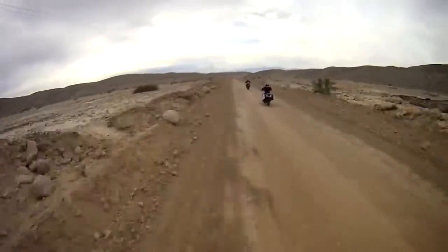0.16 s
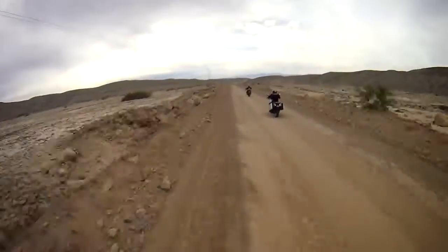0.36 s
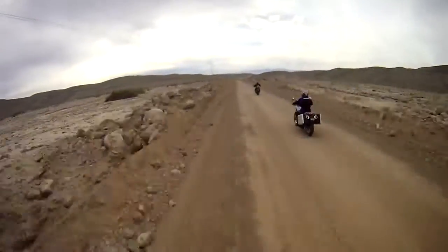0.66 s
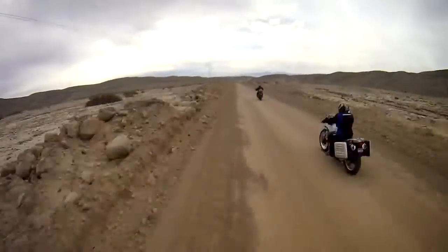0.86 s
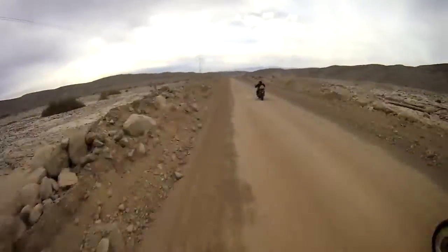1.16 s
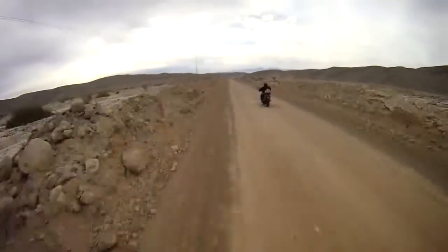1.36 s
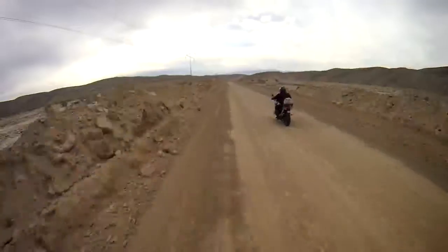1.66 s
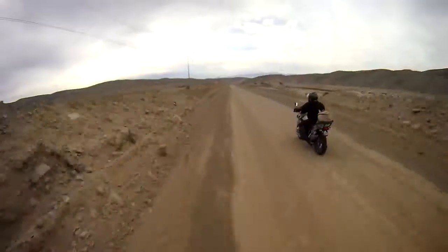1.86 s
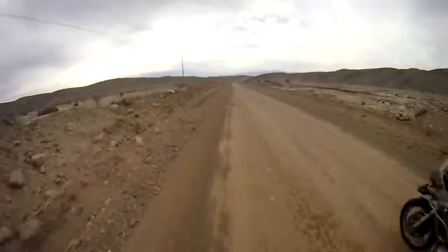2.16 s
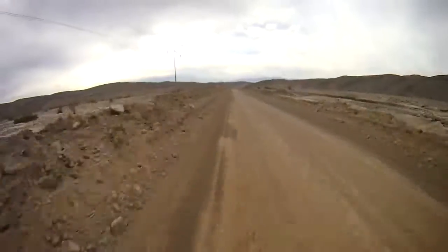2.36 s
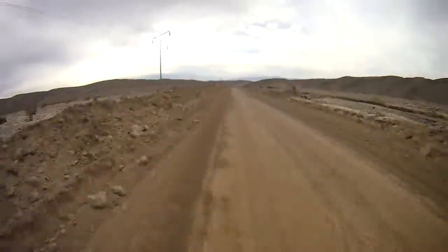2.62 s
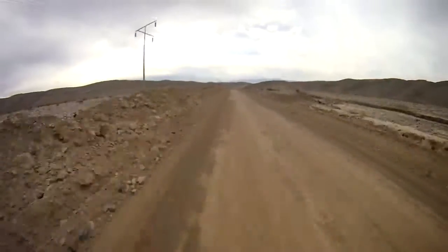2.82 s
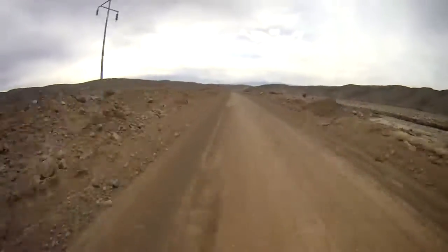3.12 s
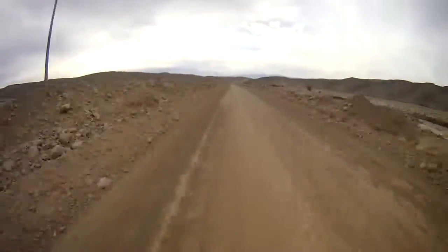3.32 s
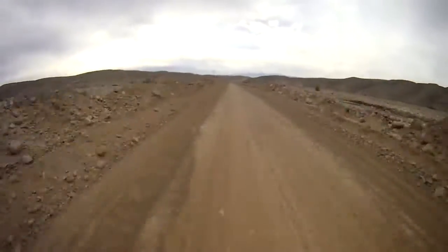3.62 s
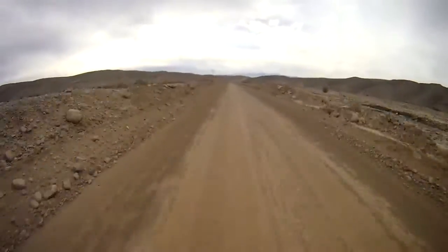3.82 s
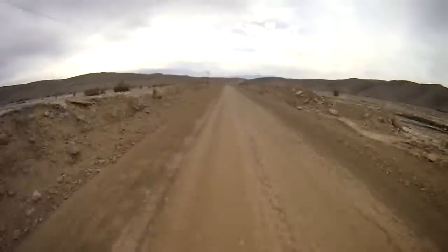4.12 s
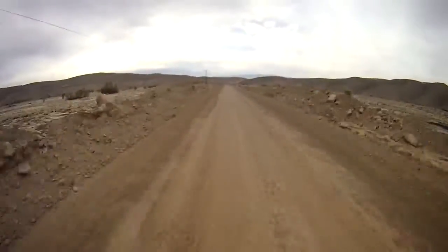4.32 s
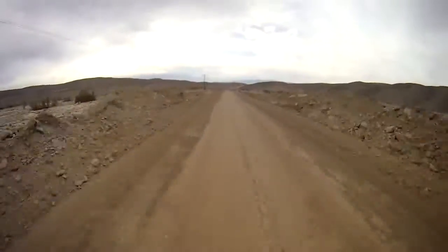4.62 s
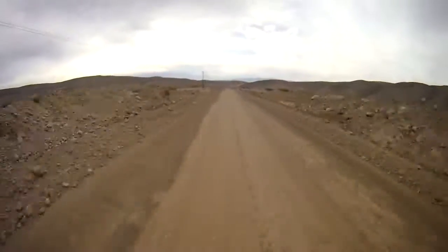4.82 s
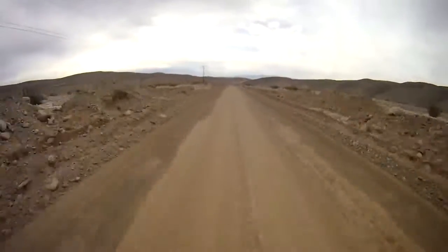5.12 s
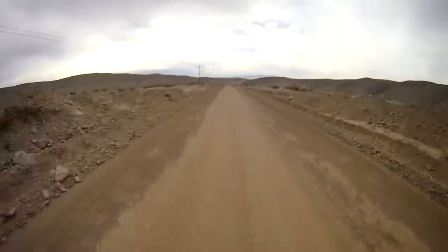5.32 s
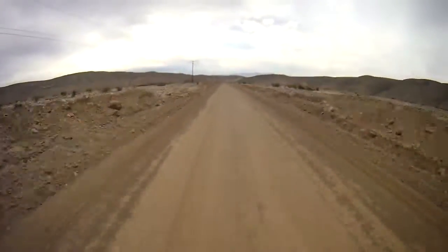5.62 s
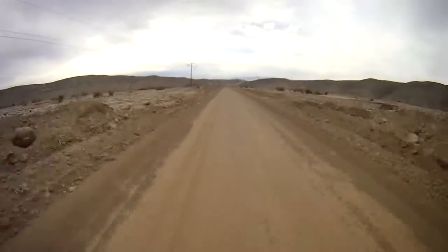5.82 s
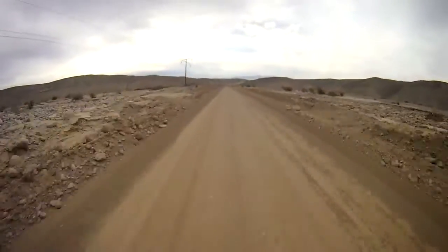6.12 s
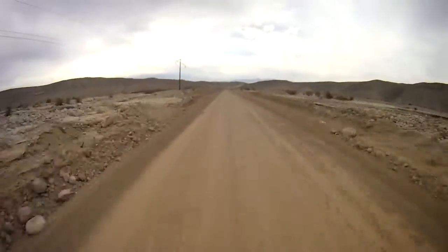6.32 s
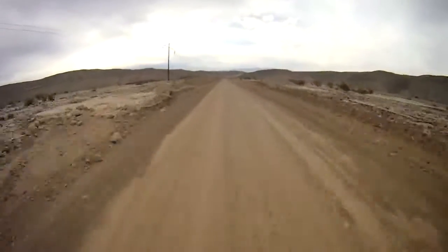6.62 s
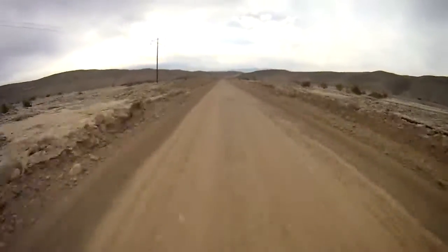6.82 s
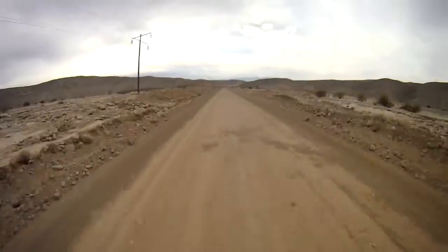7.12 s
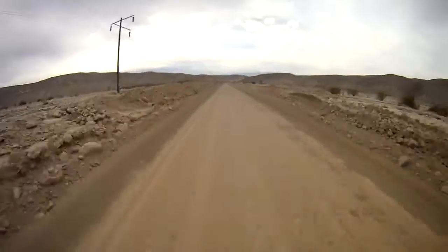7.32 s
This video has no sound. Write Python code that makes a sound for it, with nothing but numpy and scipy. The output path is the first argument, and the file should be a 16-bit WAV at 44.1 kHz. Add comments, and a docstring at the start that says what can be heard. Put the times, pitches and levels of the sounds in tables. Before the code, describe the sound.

Violent wind overloads a microphone on a motorcycle speeding along a gravel road, a harsh clipped rumble nearly burying engine drone and gritty tyre rush.

```python
"""Wind buffets a microphone far past overload on a motorcycle ridden at speed along a gravel road.
Noise-modulated eddies, deep gusts and turbulence make a heavy rumble, squared off by hard clipping.
Under it run an engine (firing pulses ringing exhaust and casing) and fluttering air rush with tyre grit.
These get through mostly as the pressure swings between its limits, which chops them into a rasp."""
import sys
import numpy as np
from scipy import signal
from scipy.fft import rfft, irfft
from scipy.io import wavfile

SR = 44100
rng = np.random.default_rng(int(sys.argv[2]) if len(sys.argv) > 2 else 0)


def wav_out(sig):
    """Save sig, one row per channel (or a flat mono array), as 16-bit PCM at SR to the path in sys.argv[1]."""
    wavfile.write(sys.argv[1], SR, np.round(np.clip(np.atleast_2d(sig).T, -1, 1) * 32767).astype(np.int16))


N = 329427
TIME = np.arange(N) / SR


def undb(db):
    """Decibels to gain."""
    return 10 ** (np.asarray(db) / 20)


def unit(x):
    """Scale to rms 1."""
    return x / np.sqrt(np.mean(x ** 2))


def colour(x, points):
    """Filter by a spectrum of (frequency [Hz], level [dB]) points, then scale to rms 1."""
    hz, db = np.transpose(points)
    f = np.maximum(np.fft.rfftfreq(N, 1 / SR), 1)
    gain = undb(np.interp(np.log(f), np.log(hz), db))
    return unit(irfft(rfft(x) * gain, N))


def noise(points):
    """Coloured noise of rms 1."""
    return colour(rng.standard_normal(N), points)


def walk(hz):
    """Smooth random motion of rms 1: noise kept to below about hz."""
    f = np.fft.rfftfreq(N, 1 / SR)
    return unit(irfft(rfft(rng.standard_normal(N)) / (1 + (f / hz) ** 4), N))


def ring(x, modes):
    """Drive (frequency [Hz], width [Hz], level [dB]) resonances in parallel; rms 1."""
    total = np.zeros(N)
    for hz, width, db in modes:
        b, a = signal.iirpeak(hz, hz / width, SR)
        total += undb(db) * signal.lfilter(b, a, x)
    return unit(total)


def soften(x, hz):
    """Round off everything above hz, with no overshoot."""
    f = np.fft.rfftfreq(N, 1 / SR)
    return irfft(rfft(x) / (1 + (f / hz) ** 2), N)


# Air rushing round the camera housing, also the colour of the grit:
# (frequency [Hz], relative level per Hz [dB])
RUSH_SPECTRUM = [(200, 5.5), (600, -3.5), (1100, -2), (1500, 5), (2000, 1), (2600, -9), (3400, -9),
                 (4600, -11.5), (6300, -18.5), (9000, -24), (16000, -35)]


def road(grit_rate=1500, size_db=4, grit_db=-21, rush_db=-13.0, flutter_db=0.64):
    """Fluttering air rush, with dense random ticks (grit_rate a second) of grit under the tyres."""
    ticks = (rng.random(N) < grit_rate / SR) * rng.standard_normal(N)
    grit = ticks * undb(size_db * rng.random(N))
    air = noise(RUSH_SPECTRUM) * undb(flutter_db * walk(35))
    return undb(rush_db) * air + undb(grit_db) * colour(grit, RUSH_SPECTRUM)


# Resonances of the exhaust: (frequency [Hz], width [Hz], relative level [dB])
EXHAUST_MODES = [(149, 224, 2), (344, 220, -2)]
# Resonances of the engine casing: (frequency [Hz], width [Hz], relative level [dB])
CASING_MODES = [(1688, 300, 35), (1930, 87, 2), (3240, 300, -30)]


def engine(firing_hz=71.25, wander=.008, scatter_db=0.5, decay=0.92, exhaust_db=-14, clatter_db=-24.0):
    """Cruising: each firing thumps the exhaust and sets off a burst of clatter in the casing."""
    firings = np.cumsum(firing_hz * (1 + wander * walk(1.5))) / SR
    # decay is in firing periods
    stroke = np.exp(-(firings % 1) / decay) * undb(scatter_db * walk(30))
    thump = ring(stroke - stroke.mean(), EXHAUST_MODES)
    clatter = ring(stroke * rng.standard_normal(N), CASING_MODES)
    return undb(exhaust_db) * thump + undb(clatter_db) * clatter


# Turbulence at the microphone port: (frequency [Hz], relative level per Hz [dB])
TURBULENCE_SPECTRUM = [(15, -23), (40, -2.5), (75, 3), (120, 1.5), (185, 1), (260, -1.5), (400, -10),
                       (700, -21.5), (1200, -31), (3000, -51)]


def turbulence():
    """Churning air at the microphone port: steady noise, strongest in the bass."""
    return noise(TURBULENCE_SPECTRUM)


# The strongest deep gusts: (time [s], length [s], strength [units of gust])
BIG_GUSTS = [(1.327, 0.063, 1.78), (2.346, .12, 2.0), (2.58, 0.0898, 1.699), (5.557, 0.059, 1.74),
             (5.769, 0.0692, 2.39), (6.06, 0.055, 1.6), (6.732, .1, 1.5)]


def gusting(pace_hz=7, share=.6):
    """Gust strength at each moment: restless chance (its spread is share), and a few big smooth swells."""
    gust = share * walk(pace_hz)
    for centre, length, strength in BIG_GUSTS:
        gust += strength * np.exp(-(2 * (TIME - centre) / length) ** 2)
    return gust


# Slow pressure swells: (frequency [Hz], relative level per Hz [dB])
SWELL_SPECTRUM = [(8, -26), (25, -2), (50, -4), (75, -5), (130, -27), (400, -75)]


def deep_rumble(gust, swell_db=3):
    """Slow pressure swells that grow by swell_db per unit of gust."""
    return undb(swell_db * gust) * noise(SWELL_SPECTRUM)


# The airstream round the camera, before the gusts act on it:
# (time [s], eddy shedding rate [Hz], buffet level [dB], air and road rush level [dB])
AIRSTREAM = [(0, 146.2, -1.5, -2), (.6, 138, 3, -0.5), (1.05, 142, -3, -1), (1.5, 142.1, -2, 1),
             (2.098, 147.1, 2, 0.4), (2.7, 140.1, -1.5, -1), (3.35, 157.4, 3, 0.5),
             (3.7, 145.7, -1.5, -0.1), (4.15, 148.5, -1, 1.1), (4.9, 146.7, 1.5, 0.5), (5.7, 139.8, 0, 0.5),
             (6.3, 148.1, 0, 1.1), (6.85, 150.8, -5, 0.5), (7.47, 150.4, -1, 2)]


def airstream():
    """The drifting stream: shedding rate, buffet level and rush level at each moment."""
    s, *columns = np.transpose(AIRSTREAM)
    return [np.interp(TIME, s, column) for column in columns]


def buffet(shed_hz, eddy_db, gust, spread_hz=68, drop_hz=8, dip_db=1.5):
    """Eddies peel off the housing at a loose rate; each unit of gust slows them and breaks them up."""
    phase = 2 * np.pi * np.cumsum(shed_hz - drop_hz * gust) / SR
    # two independent random envelopes vary both strength and timing
    eddies = unit(walk(spread_hz) * np.cos(phase) + walk(spread_hz) * np.sin(phase))
    return undb(eddy_db - dip_db * gust) * eddies


def steady(wind, rate_hz=26, evenness=0.65):
    """The stream's force is evened out from moment to moment: eddies and gusts share it; rms 1."""
    force = np.sqrt(np.abs(soften(wind ** 2, rate_hz)))
    return unit(wind / force ** evenness)


def wind_pressure(shed_hz, eddy_db, buffet_db=-.5, gust_db=-7.5, turbulence_db=0,
                  surge_db=.5, surge_hz=3):
    """Eddies, gusts and turbulence share one stream, which surges and slackens a little."""
    gust = gusting()
    wind = undb(buffet_db) * buffet(shed_hz, eddy_db, gust)
    wind += undb(gust_db) * deep_rumble(gust)
    wind += undb(turbulence_db) * turbulence()
    return undb(surge_db * walk(surge_hz)) * steady(wind)


def scene(wind_db=6.5, road_db=0.06, rise_db=1.5):
    """Pressure at the microphone, where 1 is its limit: wind on top of the engine and the road."""
    shed_hz, eddy_db, rush_db = airstream()
    pressure = undb(road_db + rush_db) * road()
    pressure += engine()
    pressure += undb(wind_db) * wind_pressure(shed_hz, eddy_db)
    # the machine gathers a little speed, and everything pushes harder: rise_db from start to end
    rise = undb(rise_db * (TIME / TIME[-1] - .5))
    return (pressure * rise)[None]


def record(dry, edge_hz=5000, sag_onset=3.0, sag_depth=.11, ceiling_db=-3.0, leak_db=-30, hiss_db=-60,
           top_hz=15800):
    """The microphone overloads: the waves clip hard, and their tops sag under the biggest pushes."""
    overload = np.tanh((soften(np.abs(dry), 330) / sag_onset) ** 4)
    sag = 1 - sag_depth * overload
    squared = soften(np.clip(dry, -1, 1), edge_hz) * sag
    # a trace of the treble still rides on the flat tops
    ripple = dry - soften(dry, 900)
    hiss = rng.standard_normal(N)
    out = undb(ceiling_db) * squared + undb(leak_db) * ripple + undb(hiss_db) * hiss
    # steep cut above top_hz
    lowpass = signal.ellip(8, .02, 50, top_hz, fs=SR, output="sos")
    return signal.sosfiltfilt(lowpass, out)


dry = scene()
out = record(dry)
wav_out(out)
```